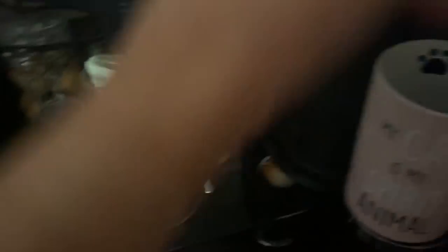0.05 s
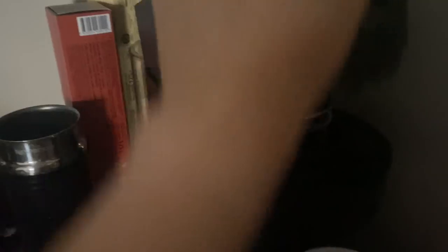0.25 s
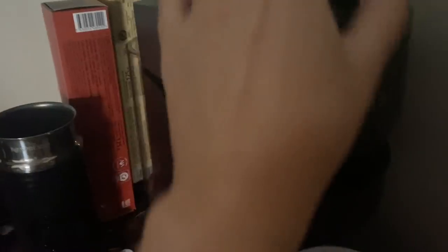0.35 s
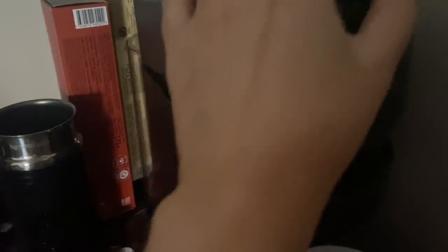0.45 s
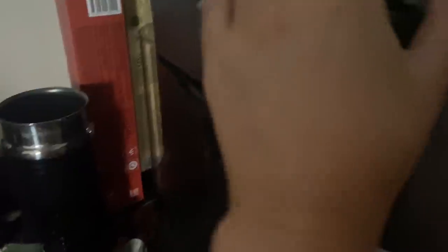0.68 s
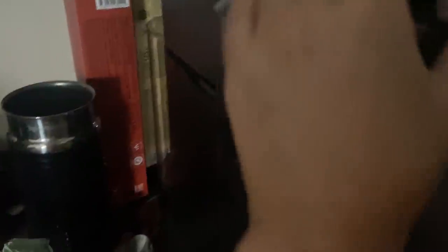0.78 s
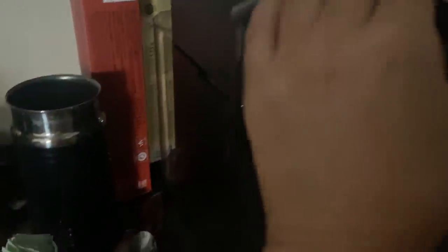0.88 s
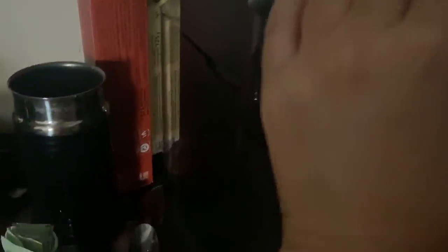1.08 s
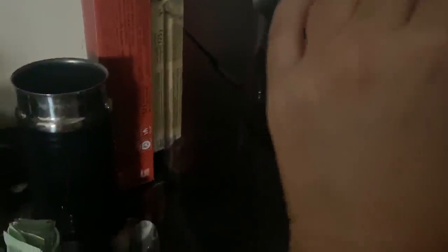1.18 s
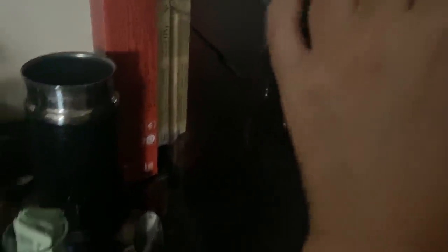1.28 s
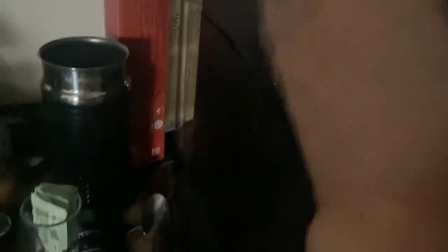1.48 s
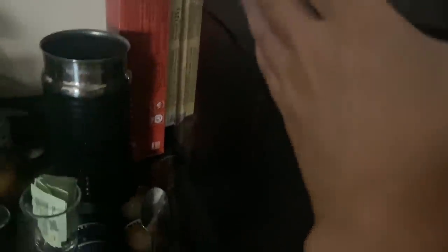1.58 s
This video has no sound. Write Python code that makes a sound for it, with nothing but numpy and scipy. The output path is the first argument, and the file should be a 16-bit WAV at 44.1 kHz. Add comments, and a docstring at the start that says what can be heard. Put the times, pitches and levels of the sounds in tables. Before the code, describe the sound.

A coffee capsule is loaded into a machine, heard close in a small, quiet kitchen. After a brief dip in level, a crisp, bright double plastic snap bursts at 0.25-0.3 s, with scraping fading by 0.5 s. A short, hard, duller clack lands at 0.72 s. Faint knocks and rubbing follow, with soft bumps near 1.03 and 1.43 s and tiny ticks around 1.5 s, over low rumble.

```python
"""On a kitchen counter, a hand loads a coffee capsule into a machine close to a phone.
Impact: each clack is a short flurry of tiny contacts that excites the modes of the housing.
Friction: between the clacks parts slide and scrape, as fluttering noise through resonances.
A diffuse tail follows the clacks; shaped noise and a low rumble form the kitchen background.
The level dips briefly, deepest just before the first clack."""
import sys
import numpy as np
from scipy import signal
from scipy.fft import rfft, irfft
from scipy.io import wavfile
from scipy.ndimage import uniform_filter1d

SR = 44100
rng = np.random.default_rng(int(sys.argv[2]) if len(sys.argv) > 2 else 0)


def store_pcm(level_fs):
    """Save levels as 16-bit WAV."""
    pcm = np.round(np.clip(level_fs, -1, 1) * 32767).astype(np.int16)
    wavfile.write(sys.argv[1], SR, np.atleast_2d(pcm).T)


N = 72765

# Flurries of contacts; levels of the parts before the click range is tilted, rise and decay over 60 dB:
# start_s, thump_db, body_db, knock_db, click_db, snap_db, sizzle_db, rise_s, hold_s, t60_s, left_over_right_db
CLACK_EVENTS = [(0.222, -50, -45, -29, -31.5, -21, -23.5, 0.0012, 0.0033, 0.024, 1.5),
                (0.228, -53, -41, -33.5, -31.5, -36, -31, 0.0022, .005, 0.062, -0.5),
                (.256, -35.5, -30, -28.5, -17.5, -8.5, -9.5, 0.00046, 0.003, 0.072, 0),
                (.2825, -48, -41, -42, -28.5, -39.5, -29, 0.0069, .008, 0.04, 13),
                (0.2834, -37, -57, -36.5, -9.5, -5, -7.5, 0.0038, 0.00052, 0.0051, -5),
                (0.295, -37.5, -51, -31, -30, -29, -28.5, 0.0039, 0.01, 0.056, 0.5),
                (0.355, -46, -31.5, -29.5, -22, -31, -37, 0.011, 0.0033, 0.041, 0.5),
                (0.411, -39, -44, -38, -39.5, -67, -69, .003, 0.0017, 0.046, 1),
                (0.455, -40, -28, -29, -43.5, -60, -43, 0.00073, 0.0015, 0.061, 0),
                (0.562, -52.5, -53, -56.5, -60.5, -64, -53.5, 0.0025, 0.0011, 0.064, -2),
                (0.607, -45.5, -45, -46.5, -49.5, -58, -67, 0.0053, 0.0033, 0.048, 2),
                (0.617, -52, -44.5, -40.5, -36.5, -55, -63, 0.00038, 0.0024, 0.072, 0.5),
                (0.635, -42.5, -53, -46, -52.5, -56.5, -56.5, 0.0025, 0.0017, 0.047, 2),
                (0.7162, -28, -30.5, -24, -15.5, -31.5, -41, 0.027, .004, 0.0069, -6),
                (0.718, -17.5, -19, -13.5, -6, -43, -51, 0.00051, 0.00018, 0.002, -1),
                (0.7216, -28.5, -29, -30, -25, -47.5, -40, 0.001, 0.003, .04, -0.5),
                (0.803, -75, -76, -49, -50, -76, -58, .003, 0.0025, 0.025, 3),
                (0.841, -44, -45.5, -45.5, -41.5, -62, -51.5, 0.0084, 0.0016, 0.15, 3.5),
                (0.898, -40.5, -43.5, -43, -52, -55, -66, 0.0016, 0.004, 0.11, 2),
                (.940, -49, -55, -53, -51, -77, -72, .012, 0.0014, 0.052, -3),
                (1.028, -32, -34.5, -33, -44, -75.5, -58.5, 0.005, 0.0016, 0.081, 0),
                (1.052, -44, -52, -68.5, -59.5, -65, -58.5, 0.0015, .003, 0.02, -0.5),
                (1.192, -54, -53, -56, -64.5, -86.5, -86, 0.0035, 0.0055, 0.038, -3),
                (1.282, -48.5, -56, -56, -66, -69.5, -66.5, .015, 0.0076, 0.061, 3),
                (1.429, -25, -31, -31.5, -35, -51, -49.5, 0.0034, 0.0024, 0.054, 1),
                (1.482, -49, -49, -69, -56.5, -51.5, -51, 0.0093, 0.0053, 0.18, 2.5),
                (1.508, -43, -53, -51, -45.5, -78, -48, .003, 0.003, 0.08, 1),
                (1.531, -53, -52, -42, -50, -56, -55, .003, 0.002, 0.036, 0),
                (1.537, -39.5, -63, -49.5, -56, -51.5, -52.5, 0.0021, 0.0039, 0.071, -0.5),
                (1.568, -37, -62, -48.5, -45.5, -45.5, -52.5, .012, 0.0027, 0.017, 1),
                (1.572, -35, -49, -41.5, -50, -59, -56.5, .003, 0.0077, 0.038, 5)]
# Limits of the seven parts (thump, body, knock, low click, high click, snap, sizzle): edge_hz
PART_LIMITS_HZ = [80, 320, 700, 1500, 2700, 4800, 8500, 15600]
# How much each of the seven parts follows the side of its clack: share (0 to 1)
PART_PAN_SHARE = [0, .5, .5, 1, 1, 1, .3]
# Modes of the housing, levels relative to one another: mode_hz, level_db, t60_s
HOUSING_MODES = [(122, -4.5, .06), (240, 9, 0.041), (436.6, 5.5, 0.025), (778, -5, 0.017), (988, -2, 0.097),
                 (1790, -5.5, 0.032), (2056, 1, 0.01), (2475, 1, 0.01), (2886, 0.5, 0.0083),
                 (3640, -11, .025), (4300, -22, .02), (4860, -4.5, 0.013), (6000, -5, .006),
                 (7290, 8, .004), (12420, -11, .006)]
# Sliding of hand and parts over time: time_s, scrape_db, low_rubbing_db, treble_db
SLIDING_LEVELS = [(0, -57, -53, -61.5), (.17, -68, -58.5, -61), (.25, -40, -37, -84),
                  (.31, -36.5, -46.5, -66), (.39, -42, -42.5, -85), (.5, -53, -45, -102),
                  (.6, -63, -62, -84), (.69, -87, -54, -72.5), (.74, -45, -51.5, -79),
                  (.83, -50, -53.5, -84), (.95, -52, -50.5, -76.5), (1.02, -52, -52, -78),
                  (1.08, -64, -51, -77), (1.2, -72, -88, -99), (1.29, -66, -65.5, -76.5),
                  (1.41, -62.5, -53.5, -77.5), (1.51, -52.5, -44.5, -58), (1.59, -58, -56, -79),
                  (1.65, -68, -55, -78.5)]
# Resonances of the scrape, levels relative to one another: centre_hz, width_hz, level_db
SCRAPE_RESONANCES = [(2010, 500, 0), (2770, 910, 29.5), (3700, 450, 0.5), (4800, 1500, -6)]
# Spectral density of the room noise, relative: frequency_hz, level_db_per_hz
AIR_SPECTRUM = [(15, -46.5), (25, -18), (70, 0), (97, -31.5), (130, -25.5), (293, -35), (326, -24),
                (863, -28), (1790, -24), (16000, -79.5)]
# Swelling and fading of the low rumble: time_s, level_db
RUMBLE_LEVELS = [(0.0, -39), (0.022, -45.5), (0.206, -46), (0.33, -46.5), (0.56, -47.5), (0.588, -38.5),
                 (0.68, -50.5), (0.73, -56.5), (0.826, -77), (0.882, -48.5), (1.08, -44.5), (1.116, -50.5),
                 (1.184, -43.5), (1.392, -48), (1.456, -42.5), (1.484, -47), (1.552, -40), (1.65, -46.5)]
# Unrelated part between the two ports, relative to the shared part: frequency_hz, level_db
STEREO_WIDTH = [(60, -22), (250, -10), (600, -5.5), (1000, -4.5), (2000, -4.5), (5000, -4), (9000, -12.5),
                (16000, -12.5)]
# Delay of the left port, negative where it leads: frequency_hz, delay_ms
LEFT_DELAY = [(300, -0.12), (1000, -.04), (2200, -.02), (7000, .005), (9600, .27)]

MODES_DB = -3  # all modes together, over the bare contact noise
CONTACT_SCATTER_DB, LARGEST_STEP = 3.5, 2.5  # spread of contact sizes; cap in steps of that spread
FIRST_BLOW = 5  # first firm contact, in sizes of an average contact
CLICK_TILT, EVEN_DB = 0.13, 6  # tilt in dB per dB of knock over snap; excess at which it is even
FLUTTER_DB, FLUTTER_RATE_HZ = 1.5, 60  # unevenness of the sliding
AIR_DB, AIR_WAVER_DB, AIR_WAVER_RATE_HZ = -57.5, 2.2, 14
RUMBLE_HZ, RUMBLE_WIDTH_HZ = 59.3, 75  # width of each of two equal passes
ROOM_T60_S, ROOM_DB, ROOM_DAMP_HZ = 0.2, -27, 6000
DIP_S, DIP_HALF_S = 0.1926, 0.039  # centre and half width of the level dip
TOP_HZ = 16500


def undb(db):
    """Decibel law: a level in dB becomes an amplitude ratio."""
    return 10 ** (np.asarray(db) / 20)


def unit(x):
    """Normalization: scale to an rms of 1."""
    return x / np.sqrt(np.mean(x ** 2))


def band(x, lo_hz, hi_hz):
    """Band limitation: pass only the range between two frequencies."""
    return signal.sosfilt(signal.butter(2, [lo_hz, hi_hz], "bandpass", fs=SR, output="sos"), x)


def ring(x, hz, width_hz):
    """Resonance: a damped mode with gain 1 at its centre."""
    return signal.lfilter(*signal.iirpeak(hz, hz / width_hz, fs=SR), x)


def on_hz(table, size):
    """Spectral interpolation: a (Hz, value) table at the bins of a transform, on a log axis."""
    rows = np.array(table)
    bins_hz = np.fft.rfftfreq(size, 1 / SR)
    return np.interp(np.log(bins_hz + 1), np.log(rows[:, 0]), rows[:, 1])


def curve(table, col):
    """Amplitude envelope: one dB column of a timed table, interpolated and made a gain."""
    rows = np.array(table)
    return undb(np.interp(np.arange(N) / SR, rows[:, 0], rows[:, col]))


def walk(rate):
    """Slow random modulation: twice-averaged noise with an rms of 1."""
    k = int(SR / rate)
    noise = rng.standard_normal(N + 2 * k)
    smooth = uniform_filter1d(uniform_filter1d(noise, k), k)
    return unit(smooth[k:N + k])


def diffuse(x):
    """Partial coherence: a shared and an unrelated signal become left and right."""
    size = x.shape[-1]
    shared = rfft(x[0])
    unrelated = rfft(x[1]) * undb(on_hz(STEREO_WIDTH, size))
    return irfft(np.array([shared + unrelated, shared - unrelated]), size)


def contact_noise(shape):
    """Micro-impacts: noise whose samples have widely spread sizes, like tiny contacts."""
    noise = rng.standard_normal(shape)
    steps = np.minimum(rng.exponential(size=shape), LARGEST_STEP)
    return unit(noise * undb(CONTACT_SCATTER_DB * steps))


def clacks():
    """Impact excitation: flurries of contacts rise, hold and die away, driving the housing."""
    size, lead = 8192, 2048  # samples in a flurry, and before its start
    contacts = contact_noise((len(CLACK_EVENTS), 2, size))
    contacts[:, 0, lead + 1] = FIRST_BLOW
    drive = np.zeros((len(PART_LIMITS_HZ) - 1, 2, N + 2 * size))
    for event, grains in zip(CLACK_EVENTS, contacts):
        start_s, thump, body, knock, click, snap, sizzle, rise_s, hold_s, t60_s, pan_db = event
        i = int(start_s * SR)
        t = (np.arange(size) - lead + i) / SR - start_s
        rise_db = 60 * t / max(rise_s, 1e-4)
        decay_db = -60 * np.maximum(t - hold_s, 0) / max(t60_s, 1e-3)
        envelope = undb(np.where(t < 0, rise_db, decay_db))
        tilt = CLICK_TILT * (knock - snap - EVEN_DB)  # a dull clack clicks low, a bright one high
        parts_db = np.array([thump, body, knock, click + tilt, click - tilt, snap, sizzle])
        sides_db = np.outer(PART_PAN_SHARE, [pan_db / 2, -pan_db / 2])
        gains = undb(parts_db[:, None] + sides_db)
        first = size + i - lead
        drive[:, :, first:first + size] += gains[:, :, None] * diffuse(envelope * grains)
    ranges = zip(drive, PART_LIMITS_HZ, PART_LIMITS_HZ[1:])
    return sum(housing(force[:, size:size + N], lo, hi) for force, lo, hi in ranges)


def housing(x, lo_hz, hi_hz):
    """Modal superposition: contact noise in one range plus the modes there, at unit noise gain."""
    def respond(force):
        bare = band(force, lo_hz, hi_hz)
        modes = 0
        for hz, db, t60_s in HOUSING_MODES:
            if lo_hz <= hz < hi_hz:
                width_hz = np.log(1000) / np.pi / t60_s  # shorter decay, broader resonance
                gain = undb(db) * np.sqrt((hi_hz - lo_hz) * t60_s / 8)
                modes = modes + gain * ring(bare, hz, width_hz)
        return bare + undb(MODES_DB) * modes

    impulse_energy = np.sum(respond(signal.unit_impulse(8192)) ** 2)
    return respond(x) / np.sqrt(impulse_energy)


def sliding():
    """Friction noise: fluttering noise gives a resonant scrape, a low rubbing and a treble rustle."""
    flutter = undb(FLUTTER_DB * walk(FLUTTER_RATE_HZ))
    noise = diffuse(rng.standard_normal((2, N))) * flutter
    scrape = unit(sum(undb(db) * ring(noise, hz, width_hz) for hz, width_hz, db in SCRAPE_RESONANCES))
    rubbing = unit(band(noise, 170, 700))
    rustle = unit(band(noise, 3800, 17000))
    return (curve(SLIDING_LEVELS, col=1) * scrape + curve(SLIDING_LEVELS, col=2) * rubbing
            + curve(SLIDING_LEVELS, col=3) * rustle)


def room(x):
    """Reverberation: a diffuse, exponentially dying tail of a small kitchen, its treble damped."""
    t = np.arange(SR // 2) / SR
    tail = rng.standard_normal((2, len(t))) * undb(-60 * t / ROOM_T60_S)
    tail = tail * (t > .004)  # the tail follows the direct sound
    tail = signal.lfilter(*signal.butter(1, ROOM_DAMP_HZ, fs=SR), tail)
    tail = tail / np.sqrt(np.sum(tail ** 2) / 2)
    mono = x.mean(axis=0)[None]
    return undb(ROOM_DB) * signal.fftconvolve(mono, tail, axes=1)[:, :N]


def kitchen():
    """Spectral shaping: wavering coloured room noise and a resonant low rumble that swells and fades."""
    air_noise = diffuse(rng.standard_normal((2, N)))
    air = unit(irfft(rfft(air_noise) * undb(on_hz(AIR_SPECTRUM, N)), N))
    noise = diffuse(rng.standard_normal((2, N)))
    once = ring(noise, RUMBLE_HZ, RUMBLE_WIDTH_HZ)
    rumble = unit(ring(once, RUMBLE_HZ, RUMBLE_WIDTH_HZ))
    waver = undb(AIR_WAVER_DB * walk(AIR_WAVER_RATE_HZ))
    return undb(AIR_DB) * air * waver + rumble * curve(RUMBLE_LEVELS, col=1)


def scene():
    """Superposition: clacks, their tail, sliding and kitchen add up under one brief level dip."""
    t = np.arange(N) / SR
    hits = clacks()
    dip = np.clip(np.abs(t - DIP_S) / DIP_HALF_S, .02, 1) ** 1.05
    return (hits + room(hits) + sliding() + kitchen()) * dip


def record(dry):
    """Phase delay and saturation: the left port is shifted by frequency, peaks round, the top is cut."""
    delay_s = on_hz(LEFT_DELAY, N) / 1000
    turn = np.exp(-2j * np.pi * np.fft.rfftfreq(N, 1 / SR) * delay_s)
    ports = np.array([irfft(rfft(dry[0]) * turn, N), dry[1]])
    top_cut = signal.ellip(10, .2, 90, TOP_HZ, fs=SR, output="sos")
    return signal.sosfilt(top_cut, np.tanh(ports))


dry = scene()
out = record(dry)
store_pcm(out)
```